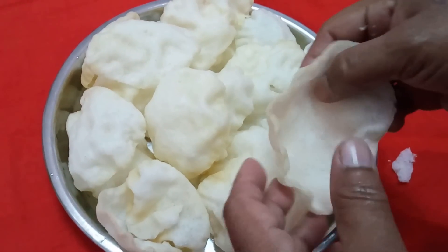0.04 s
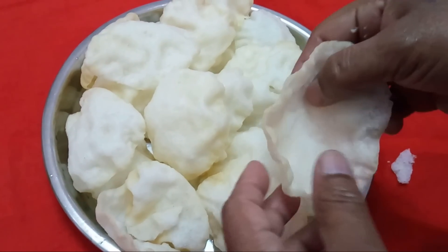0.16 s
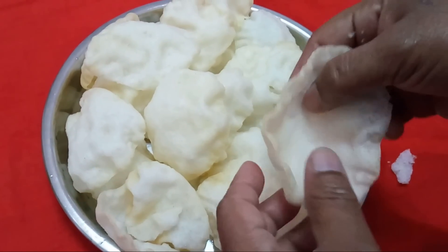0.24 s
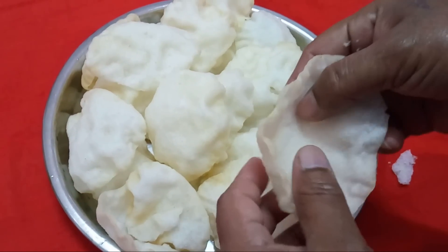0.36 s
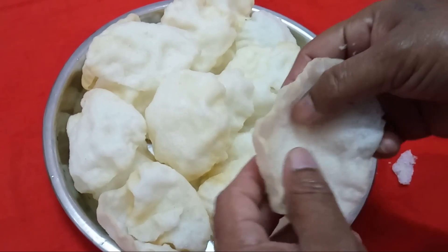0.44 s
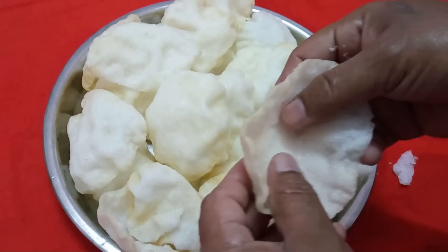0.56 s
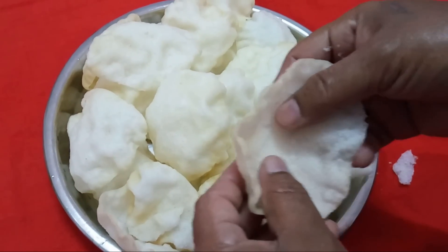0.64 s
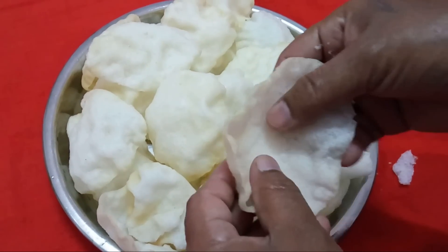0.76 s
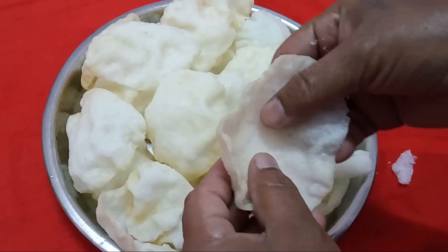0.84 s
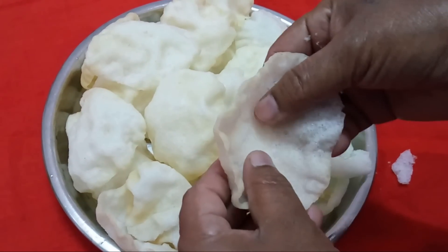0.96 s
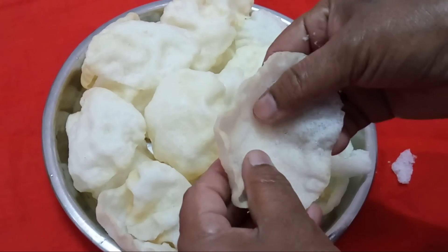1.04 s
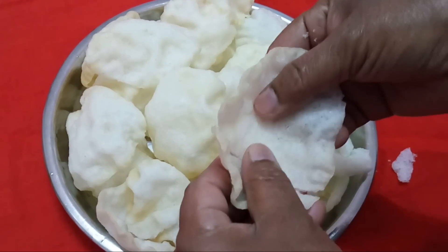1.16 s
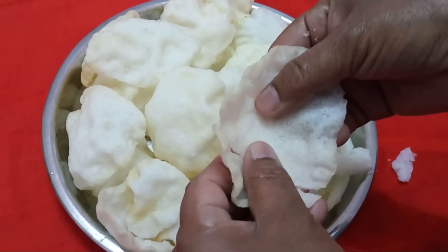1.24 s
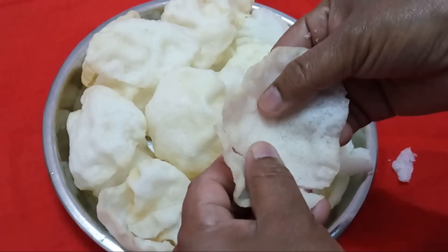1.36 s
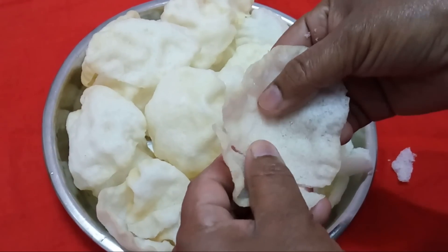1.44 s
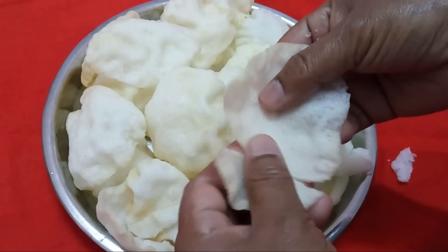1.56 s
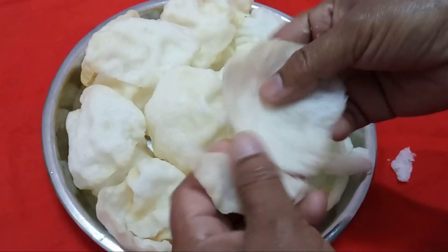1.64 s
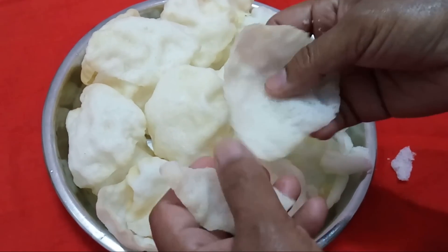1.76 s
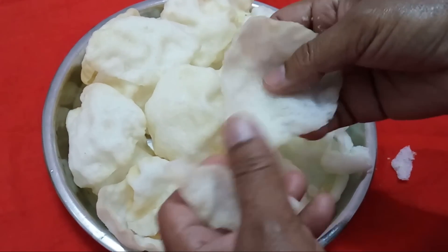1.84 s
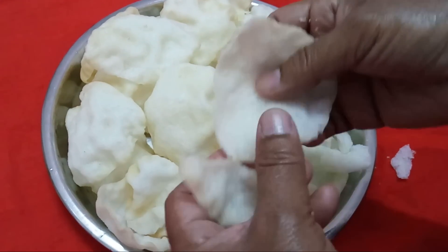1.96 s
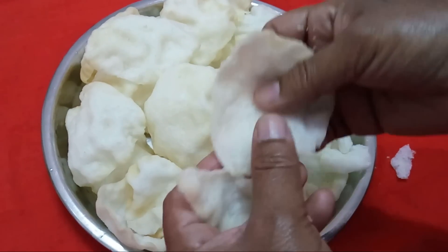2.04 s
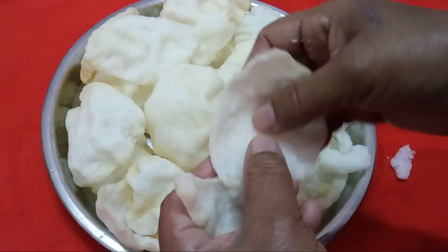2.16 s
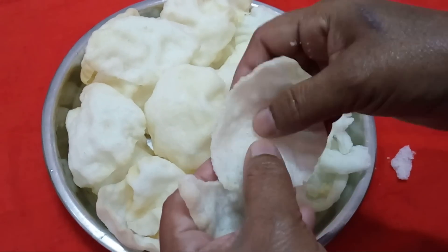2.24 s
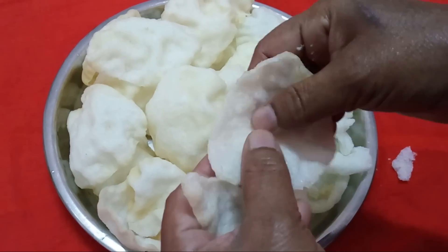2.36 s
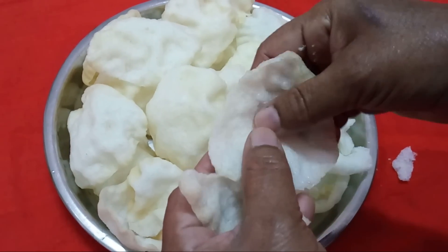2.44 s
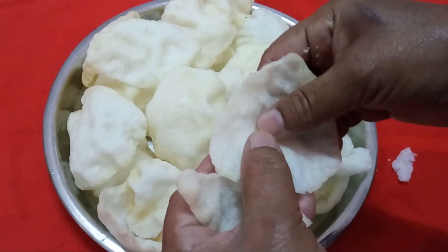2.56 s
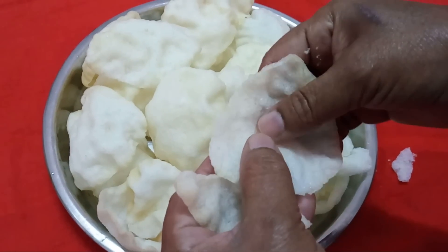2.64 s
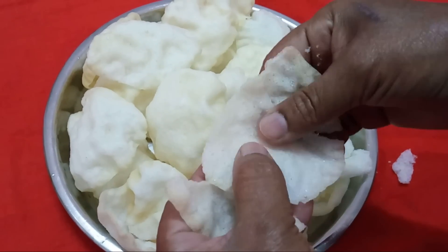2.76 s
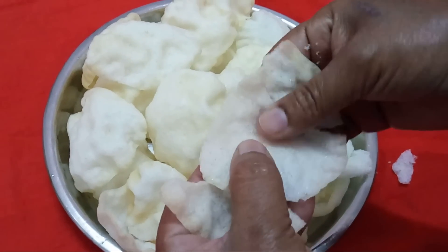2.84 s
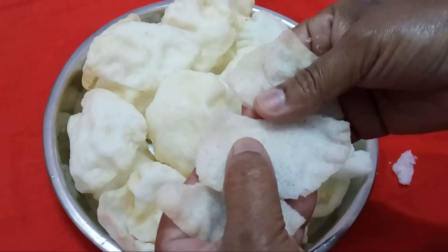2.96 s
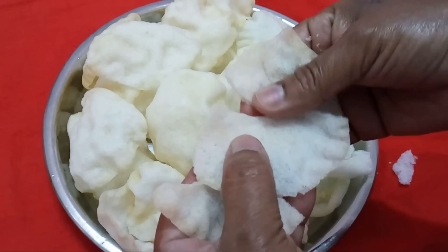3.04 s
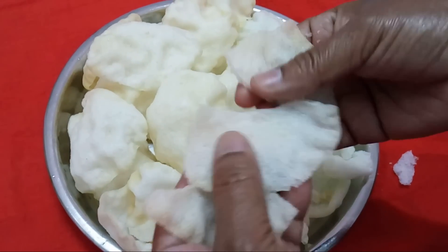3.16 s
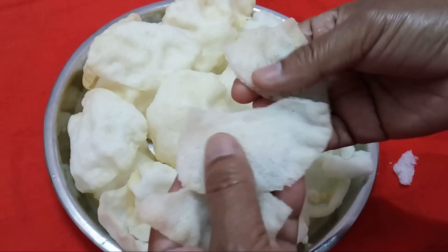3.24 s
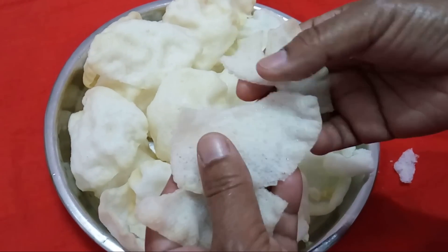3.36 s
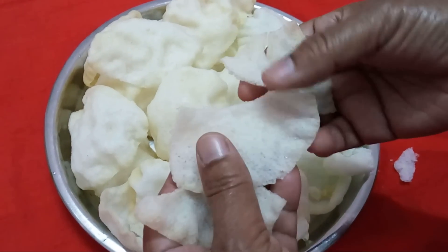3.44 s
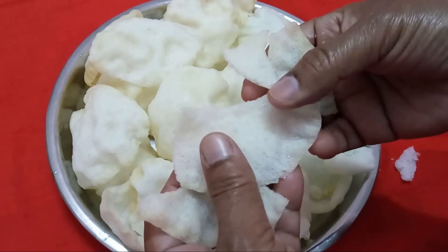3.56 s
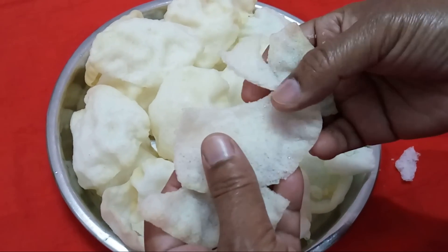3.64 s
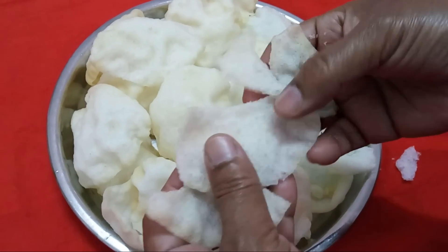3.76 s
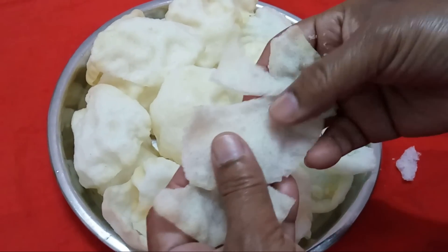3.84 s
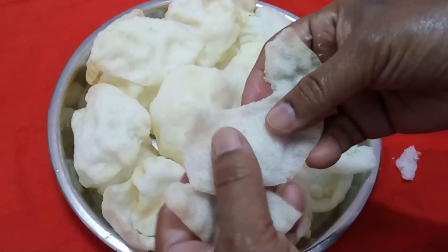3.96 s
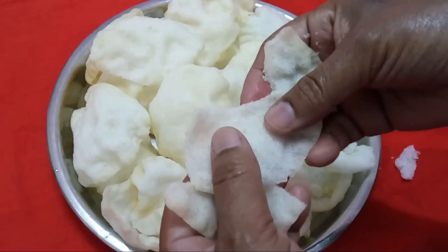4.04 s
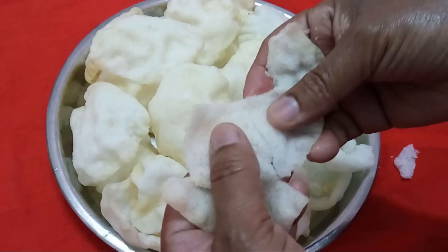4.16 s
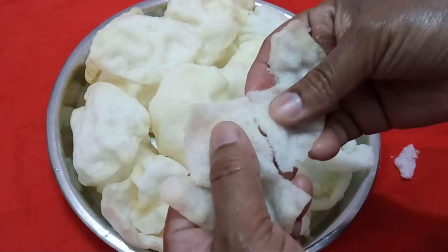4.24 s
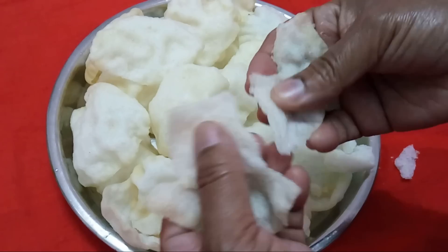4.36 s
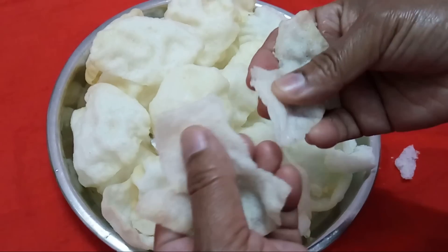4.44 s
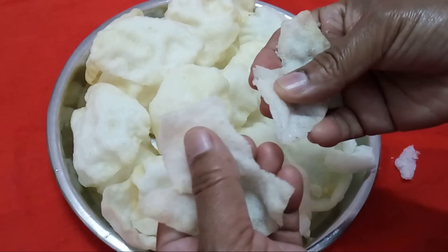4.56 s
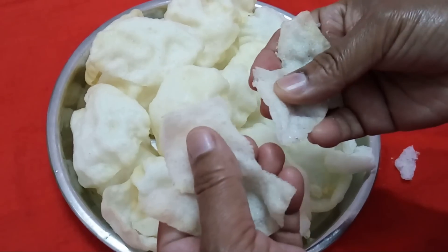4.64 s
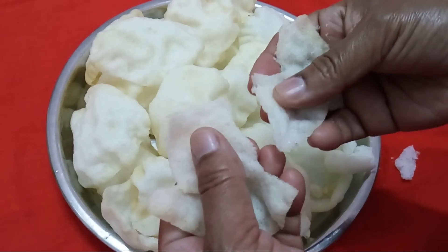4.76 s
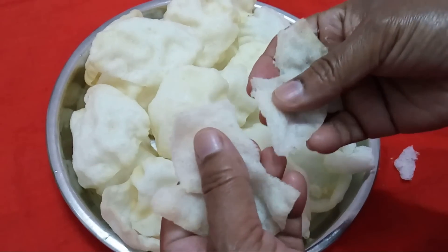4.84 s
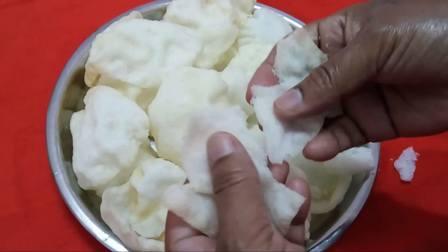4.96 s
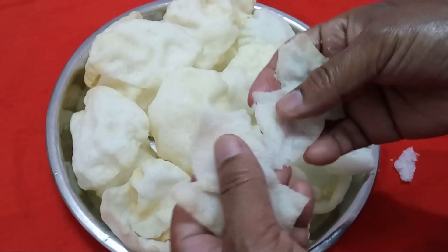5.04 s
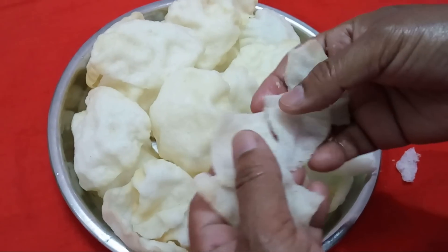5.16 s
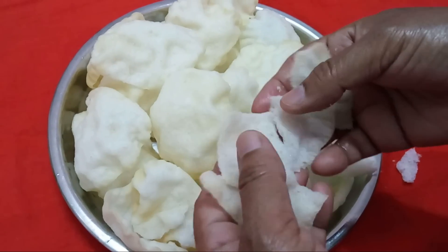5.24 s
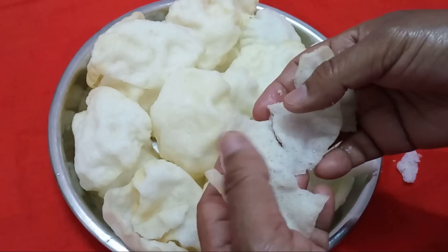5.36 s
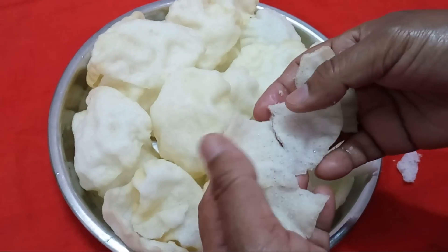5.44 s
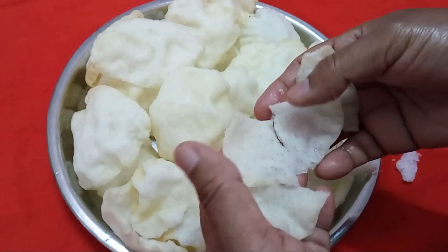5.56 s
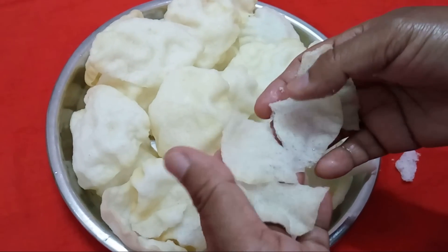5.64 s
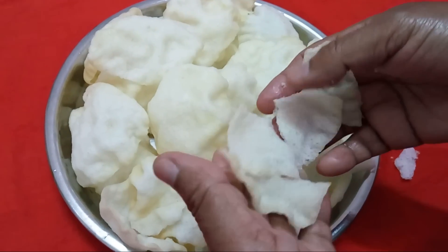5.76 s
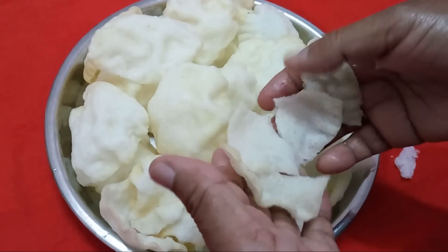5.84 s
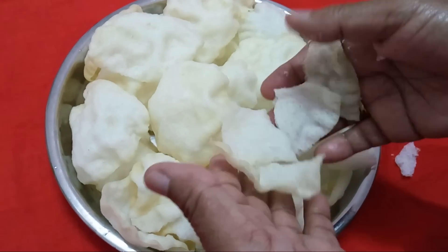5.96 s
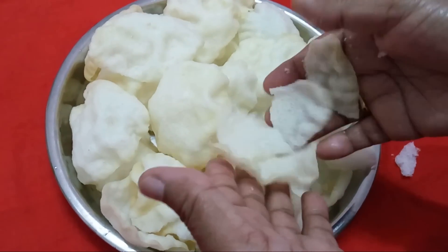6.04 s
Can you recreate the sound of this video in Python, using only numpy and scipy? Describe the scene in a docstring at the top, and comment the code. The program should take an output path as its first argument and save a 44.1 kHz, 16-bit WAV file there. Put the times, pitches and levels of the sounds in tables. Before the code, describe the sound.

In a kitchen, close to a phone with two microphones, hands break a crisp fried wafer over a steel plate. A distant engine hums low throughout, unsteady and boomy, growing stronger between about 2 and 4.5 seconds, then easing. At first fingers rasp softly and jerkily on the blistered crust, with a few tiny ticks. At 1.25 s the wafer snaps loudly with a short thump; smaller cracks follow from 1.5 to 1.8 s. From 2.1 s crackling thickens, a thin high ring briefly joining the rasp, and strong breaks land at 2.8 s, with a deep thump, and 3.03 s. After a lull of rubbing, clustered crunches run from 3.6 to 4.45 s. At about 4.45 s a shard clinks on the plate and bounces with a short metallic ring. Sparse faint ticks and rustles remain until about 6 s. Cracks are bright, dry and mostly left.

```python
"""Close to a phone with two microphones, hands break a crisp fried wafer over a steel plate heaped with more.
From the start a distant engine booms in the low kitchen modes: wavering overtones over filtered noise.
Fingers and shards rasp on the blistered crust (jerky noise and pops); brittle cells crack in short bursts.
From 1.25 s pieces snap with damped swings; near 2 s a thin ring joins the rasp (noise in resonances);
past 4.4 s a shard hits and bounces on the plate, ringing its damped modes."""
import sys
import numpy as np
from scipy import signal
from scipy.fft import rfft, irfft
from scipy.io import wavfile
from scipy.ndimage import uniform_filter1d

SR = 44100
rng = np.random.default_rng(int(sys.argv[2]) if len(sys.argv) > 2 else 0)


def amplitude_ratio(level_db):
    """Convert a level in decibels to the matching linear amplitude (field) ratio."""
    exponent = np.asarray(level_db, float) / 20
    return 10 ** exponent


def generate_wav(sig):
    """Save sig (samples, or channels by samples) to the path in sys.argv[1] as 16-bit PCM at SR."""
    pcm = np.round(np.clip(np.atleast_2d(sig).T, -1, 1) * 32767).astype(np.int16)
    wavfile.write(sys.argv[1], SR, pcm)


N = 269186
TIME_S = np.arange(N) / SR

# distant engine: start_s, firing_hz, load_db
ENGINE = [(0, 23, -54), (.13, 22.7, -45.5), (.36, 21.7, -53), (.6, 20.5, -47.5), (1.1, 18.7, -49.5),
          (1.45, 18.1, -44), (1.7, 18.2, -47), (2.1, 18.9, -41), (2.42, 19, -45.5), (2.6, 19.3, -37),
          (2.75, 19.3, -44.5), (3.14, 19.4, -38.5), (3.25, 19.6, -44.5), (3.42, 19.3, -34.5),
          (3.7, 19.1, -41), (4.0, 18.8, -35.5), (4.2, 18.4, -41.5), (4.45, 18.3, -39.5),
          (5.03, 17.4, -41.5), (5.16, 17.3, -46.5), (5.75, 17.4, -52.5), (5.98, 17.6, -45.5),
          (6.1, 17.6, -50.5)]
# room modes that lift the booms: mode_hz, width_hz, level_db
KITCHEN_MODES = [(83.3, 2.6, 2.3), (85.6, 12.6, 12.25), (88.06, 9.9, 11.6), (117.53, 11.45, 16.93),
                 (140.1, 13.5, 4.6), (206, 17.3, 0.56), (303.1, 46.5, 4.37)]
# balance of higher booms against the lowest as the engine moves: start_s, tilt_db
UPPER_BOOMS = [(0, 0.5), (1.1, -2.5), (1.5, 1), (2.5, 4.5), (4.0, 2.5), (4.4, -2), (5, 0.5), (6.1, 2.5)]
# spectrum of the low rumble: freq_hz, level_db (per Hz)
RUMBLE_COLOUR = [(20, -26), (32, 11), (56, -19), (72, 6), (135, 11.5), (175, -6), (212, 4), (308, 0),
                 (400, 0.5), (460, -13), (1000, -22.5), (1600, -45.5)]
# spectrum of the hiss: freq_hz, level_db (per Hz)
HISS_COLOUR = [(290, -27), (500, -7), (980, -8), (1520, -12), (4050, -27.5), (15100, -81), (16500, -18)]
# brief drops of background and, in part, rasp round the loudest cracks: start_s, end_s, level_db
DIPS = [(1.184, 1.222, -13), (2.763, 2.805, -11.5), (2.837, 2.889, -18), (2.924, 3.078, -13),
        (4.228, 4.338, -12)]
# strokes of skin and shards along the crust: peak_s, relative_level_db, rise_s, fall_s
STROKES = [(0, -37.5, 0.035, 0.33), (0.149, -29.5, 0.034, 0.061), (0.323, -34, 0.026, 0.071),
           (.49, -31.5, 0.058, 0.062), (.645, -33, 0.18, 0.06), (0.738, -32, 0.017, 0.022),
           (.93, -41.5, 0.32, 0.14), (1.17, -35.5, 0.3, 0.016), (1.327, -24.5, 0.092, 0.13),
           (1.61, -30.5, 0.048, 0.086), (1.681, -26.5, 0.046, 0.15), (1.78, -39, 0.21, 1),
           (2.088, -37, 0.046, 0.13), (2.23, -28.5, 0.11, 0.13), (2.47, -27.5, 0.098, 0.087),
           (2.82, -30, 0.063, 0.25), (3.05, -28, 0.33, 0.33), (3.291, -26.5, 0.078, 0.038),
           (3.62, -39, 0.62, 0.38), (3.76, -38, 0.044, 0.21), (3.88, -38.5, 0.08, 0.36),
           (3.98, -31.5, 0.039, 0.06), (4.14, -32.5, 0.17, 0.069), (4.36, -29, 0.26, 0.12),
           (4.471, -36, 0.43, 0.14), (5.198, -40, 0.0089, 0.025), (5.259, -38.5, 0.064, 0.22),
           (5.47, -41.5, 0.042, 0.012), (5.7, -34, 0.013, 0.026), (5.8, -47, 0.11, 0.1),
           (6.001, -42, 0.069, 0.8)]
# stirring by fingers at rest on the crust: start_s, relative_level_db
GRIP = [(0, -41.5), (4.5, -77), (4.65, -56.5), (6.1, -58.5)]
# tone of the piece in hand: start_s, treble_share_db, lean (from the lower to the upper middle part)
PIECE = [(0, -4.5, -0.3), (1.2, -5, 0.22), (2.0, -3.5, -0.21), (2.3, -4, 0.089), (3.0, -3, 0.031),
         (3.9, -5.5, 0.71), (4.3, -3, 0.98), (4.5, -6.5, 0.4), (6.1, -0.5, -0.16)]
# rings of the whole wafer under the fingers: ring_hz, width_hz, relative_level_db
WHOLE_WAFER = [(1710, 300, -15), (3050, 450, -5), (5400, 500, -10)]
# crust as the microphones colour it: freq_hz, level_db (per Hz)
CRUST = [(290, -8), (500, -10.5), (1130, -10), (1610, -7.5), (2290, -6.5), (2650, 0), (3500, 7), (3930, 5),
         (6470, 7), (7710, 0.5), (10000, 11), (13200, -2), (15100, 4), (15800, -8), (16500, -40)]
# edges of the four parts of the crust spectrum: edge_hz
EDGES_HZ = [600, 2500, 4400, 8000, SR]
# cracks, each with its own low part and ring pitch: start_s, relative_level_db, low_part_db, ring_hz
CRACKS = [(0.018, -26.5, -27, 4800), (0.1404, -28, -5, 3200), (0.2235, -20.5, -3.5, 3950),
          (0.988, -29, -20.0, 2740), (1.0095, -19.5, -14, 2950), (1.181, -11, -16, 5200),
          (1.191, -13, -14.0, 5430), (1.2481, -14.5, 3.5, 4260), (1.2489, 1, -6, 3044),
          (1.25, -6.5, -8.5, 3530), (1.5312, -22.5, -10, 3360), (1.5776, -17, -14, 7300),
          (1.5835, -14, -32.0, 2930), (1.611, -11.5, -12, 2960), (1.64, -11, -25.0, 3700),
          (1.702, -19.5, -21.0, 3400.0), (1.7669, -12.5, -14, 3950), (2.087, -15, -31.0, 6100.0),
          (2.147, -12.5, -34, 6300), (2.161, -6.5, -29, 6400), (2.2253, -20, -20, 2780),
          (2.234, -13.5, -11, 4900), (2.3072, -17.5, -29.0, 6700.0), (2.325, -15, -29.0, 4080),
          (2.35, -11.5, -35, 6540), (2.383, -13, -21.0, 4120), (2.406, -15, -20, 6400.0),
          (2.4173, -19.0, -33.0, 6500.0), (2.4263, -15.5, -30, 6700.0), (2.456, -9, -35, 4100),
          (2.464, -16, -33, 4250), (2.479, -10.5, -44, 6460), (2.5012, -11, -32.0, 6160),
          (2.588, -23, -26, 6600.0), (2.683, -19, -19.0, 3760), (2.6947, -17, -9, 6400),
          (2.733, -19, -20, 4300), (2.745, -16, -30.0, 4400.0), (2.7693, -17, -22, 5100),
          (2.787, -19.5, -21, 3700.0), (2.7968, -12.5, -36.0, 3600.0), (2.8138, 0, -1.5, 4800.0),
          (2.818, -5, -10.0, 5600.0), (2.828, -10, -32.0, 4540), (2.8561, -11, -24, 4870),
          (2.938, -13, -28, 5070), (2.943, -7, -22, 4500), (2.999, -21, -14, 3380),
          (3.003, -16.5, -27.0, 3440), (3.0333, 0.5, -5, 3470), (3.0366, -20, -17, 4000.0),
          (3.366, -21.5, -30.0, 4740), (3.59, -23, -25, 2870), (3.5988, -19.0, -12, 6460),
          (3.63, -10.5, -14, 6200), (3.647, -12.5, -18, 2800.0), (3.652, -23, -15, 4600),
          (3.665, -19, -6, 4500), (3.685, -13, -12.5, 2820), (3.7493, -19, -5, 3180),
          (3.755, -20, -19, 3250), (3.7882, -20, -7.5, 3300.0), (3.852, -19, -22, 6140),
          (3.8686, -12.5, -27.0, 4640), (3.874, -14, -14, 3300), (3.8966, -12.5, -15, 6070),
          (4.0193, -17.5, -25, 4630), (4.1025, -19, -22, 4230), (4.131, -15, -32, 6240),
          (4.1439, -12.0, -11.5, 3200), (4.1623, -24, 8.5, 4500.0), (4.1771, -16.5, -8.0, 3660),
          (4.1812, -11.5, -5, 3030), (4.215, -23, -5, 4740), (4.2306, -19, -23, 5600.0),
          (4.2401, -10, -11, 4600), (4.295, -11, -16, 5500.0), (4.2966, -8.5, -2.5, 5740),
          (4.381, -15, -32.0, 6400), (4.41, -17, -28.0, 5000.0), (4.4425, -18, -2, 4200),
          (4.4777, -16, -28.0, 4040), (5.005, -22.5, -11, 6140), (5.1933, -23.5, -21.0, 6100),
          (5.2478, -20, -13.5, 6240), (5.3563, -22.5, -26, 3200.0), (5.693, -25.5, -40, 6750),
          (5.711, -24.5, -30, 6000)]
# pieces giving way and pushing air: start_s, peak_db, swing_hz, t60_s
THUMPS = [(1.2493, -18, 105, .065), (2.8135, -8, 96, .075), (2.158, -36, 1700, .04),
          (3.0345, -18, 230, .018), (4.1615, -32, 800, .03), (4.178, -25, 1560, .03),
          (4.298, -21, 170, .025), (4.453, -33, 800, .03)]
# thin ring under the rasp: ring_hz, width_hz, relative_level_db
SINGING = [(2715, 30, 5), (3065, 50, 2)]
# level of the thin ring: start_s, level_db
SINGING_LEVEL = [(1.97, -57), (2.04, -38), (2.063, -40.5), (2.1, -34.5), (2.17, -44.5), (2.26, -33.5),
                 (2.3, -36.5), (2.43, -48), (2.6, -45), (2.7, -59)]
# modes of the steel plate: mode_hz, relative_level_db, t60_s
PLATE = [(1513, -17, .12), (1949, -21, .3), (2143, -8, .2), (2358, -18, .25), (2955, -6, .08),
         (3252, -14, .33), (3634, -8, .28), (3962, -1, .28), (4226, -2, .24), (4320, 4, .05),
         (4393, -3, .09), (4678, -13, .28), (4888, -8, .17), (5087, -9, .1), (5486, -15, .22),
         (5895, -8, .2), (5975, -12, .15), (6331, -16, .25)]
# blows on the plate: start_s, relative_level_db, brightness_db_per_octave
PLATE_HITS = [(4.443, -23, -2), (4.478, -34.5, 1), (4.542, -36.5, -8.5)]


def curve(table):
    """Interpolates the value columns of a (s, value, ..) table at every sample."""
    s, *columns = np.transpose(table)
    return [np.interp(TIME_S, s, c) for c in columns]


def colour(x, points, lo_hz=1., hi_hz=1e6, size=1024):
    """Minimum-phase filter with the given spectrum between soft edges; white noise keeps its power."""
    hz = np.maximum(np.fft.rfftfreq(size, 1 / SR), 1)
    point_hz, point_db = np.transpose(points)
    gain = amplitude_ratio(np.interp(np.log(hz), np.log(point_hz), point_db))
    gain = gain / np.sqrt((1 + (lo_hz / hz) ** 6) * (1 + (hz / hi_hz) ** 8)) + 1e-6
    # folding the cepstrum makes the response causal
    cepstrum = irfft(np.log(gain))
    cepstrum = np.r_[cepstrum[0], 2 * cepstrum[1:size // 2], np.zeros(size // 2)]
    response = irfft(np.exp(rfft(cepstrum)))
    response = response / np.sqrt(np.sum(response ** 2))
    response = np.reshape(response, (1,) * (np.ndim(x) - 1) + (-1,))
    return signal.oaconvolve(x, response, axes=-1)[..., :N]


def band(x, hz, width_hz):
    """Steep resonance; white noise keeps its power."""
    edges_hz = hz * (1 + width_hz / hz / 2) ** np.array([-1, 1])
    sos = signal.butter(2, edges_hz, "bandpass", fs=SR, output="sos")
    return np.sqrt(SR / 2 / width_hz) * signal.sosfilt(sos, x)


def walk(rate_hz):
    """Random levels held 1 / rate_hz and slewed twice; spread near 1."""
    hold = int(SR / rate_hz)
    steps = np.repeat(rng.standard_normal(N // hold + 1), hold)
    return 1.3 * uniform_filter1d(uniform_filter1d(steps, hold), hold)[:N]


def ring(x, hz, t60_s):
    """One damped mode as a complex one-pole resonator."""
    pole = np.exp(2j * np.pi * hz / SR - np.log(1000) / (t60_s * SR))
    return signal.lfilter([1], [1, -pole], x).imag


def ports(noise, alike):
    """Two microphones from three noises: a shared part that reaches the left first, and parts of their own."""
    lag_samples = 8
    shared = np.array([noise[0], np.roll(noise[0], lag_samples)])
    return np.sqrt(alike) * shared + np.sqrt(1 - alike) * noise[1:]


def shares(low_db, treble_db, lean):
    """Gains of four spectrum parts; the two middle ones split the power that the treble leaves."""
    treble = np.clip(amplitude_ratio(treble_db), 0, .97)
    middle = np.sqrt(1 - treble ** 2)
    angle_rad = np.pi / 4 * (1 + np.tanh(lean))
    return np.array([amplitude_ratio(low_db), middle * np.cos(angle_rad), middle * np.sin(angle_rad), treble])


def crust(parts):
    """The crust colours each part of its excitation within that part's band."""
    return sum(colour(x, CRUST, lo, hi) for x, lo, hi in zip(parts, EDGES_HZ, EDGES_HZ[1:]))


def dips():
    """Brief drops in level, in dB: 4 ms down, 34 ms back."""
    return sum(db * np.interp(TIME_S, [start - .004, start, end, end + .034], [0, 1, 1, 0])
               for start, end, db in DIPS)


def boom(hz, db):
    """One engine overtone, lifted near room modes: nearly a tone, wavering in size and phase."""
    between_modes_db, upper_from_hz, waver_db = -7, 100.4, 2.8
    blur_rad_per_100_hz = 0.69  # uneven firing smears the higher overtones more
    lift = amplitude_ratio(between_modes_db) ** 2
    for mode_hz, width_hz, top_db in KITCHEN_MODES:
        lift = lift + amplitude_ratio(top_db) ** 2 / (1 + (2 * (hz - mode_hz) / width_hz) ** 2) ** 2
    tilt_db = curve(UPPER_BOOMS)[0] * np.clip((hz - upper_from_hz) / 5, -1, 1)
    size = amplitude_ratio(db + waver_db * walk(12) + tilt_db)
    blur_rad = blur_rad_per_100_hz * hz / 100 * walk(10)
    turns = np.cumsum(hz) / SR + rng.random()
    return np.sqrt(2 * lift) * size * np.sin(2 * np.pi * turns + blur_rad)


def kitchen():
    """Engine booms and rumble, nearly alike at both microphones, over faint independent hiss."""
    overtones, overtone_db_per_octave = range(4, 18), -7
    rumble_over_load_db, rumble_waver_db, rumble_slew_s = 2.5, 2.8, 0.33
    left_over_right_db, side_db, hiss_db = 1.1, -6.5, -57
    firing_hz, load_db = curve(ENGINE)
    rumble_db = uniform_filter1d(load_db, int(rumble_slew_s * SR)) + rumble_over_load_db
    rumble = colour(rng.standard_normal((2, N)), RUMBLE_COLOUR, size=8192)
    mid, side = rumble * amplitude_ratio(rumble_db + rumble_waver_db * walk(25))
    booms = sum(boom(k * firing_hz, load_db + overtone_db_per_octave * np.log2(k / overtones[0]))
                for k in overtones)
    balance = amplitude_ratio(np.array([[left_over_right_db], [-left_over_right_db]]) / 2)
    low = balance * (mid + booms) + amplitude_ratio(side_db) * np.array([side, -side])
    hiss = amplitude_ratio(hiss_db) * colour(rng.standard_normal((2, N)), HISS_COLOUR)
    return (low + hiss) * amplitude_ratio(dips())


def strokes():
    """Level, treble share and lean of the rasp: strokes swell and fade over the resting grip."""
    edge_db = -15  # one rise before and one fall after the peak
    brighter_per_db, middling_db = -0.04, -41.5
    power = amplitude_ratio(curve(GRIP)[0]) ** 2
    for s, peak_db, rise_s, fall_s in STROKES:
        before = (s - TIME_S) / max(rise_s, .005)
        after = (TIME_S - s) / max(fall_s, .005)
        away = np.where(TIME_S < s, before, after)
        power = power + amplitude_ratio(peak_db + edge_db * away) ** 2
    db = 10 * np.log10(power)
    treble_db, lean = curve(PIECE)
    return db, treble_db + brighter_per_db * (db - middling_db), lean


def pop_grains():
    """Small cells pop at random; each pop favours its own part of the spectrum."""
    pops_per_s, pop_db, scatter_db, top_db, decay_ms, part_db = 190, -1, 4.5, 10, .6, 5
    extra_db = np.minimum(scatter_db * rng.exponential(size=N), top_db)
    pops = (rng.random(N) < pops_per_s / SR) * amplitude_ratio(pop_db + extra_db)
    pops = pops * amplitude_ratio(part_db * rng.uniform(-3.23, 1, (5, N)))
    shape = np.exp(-np.abs(np.arange(-128, 129)) * 1000 / (decay_ms * SR))
    return signal.oaconvolve(pops, shape[None], "same", axes=-1)


def rasp():
    """Skin slides on the crust in uneven jerks; the wafer rings under the fingers until it breaks."""
    patchy_db, left_over_right_db, low_db, trim_db = 3.0, 4.5, -18, -7.0
    dip_share, first_break_s = 0.22, 1.25
    db, treble_db, lean = strokes()
    level = amplitude_ratio(db + trim_db + dip_share * dips())
    drive = level * (amplitude_ratio(patchy_db * walk(60)) + pop_grains())
    sides = amplitude_ratio(np.array([[left_over_right_db], [-left_over_right_db]]) / 2)
    # a duller rasp reaches further down
    gains = shares(low_db - 2.47 * treble_db, treble_db, 0.041 * walk(23) + lean)
    # each part flickers a little on its own
    gains = gains * amplitude_ratio([2.67 * walk(40) for _ in range(4)])
    whole = TIME_S < first_break_s
    rubbed = sides * ports(rng.standard_normal((3, N)) * drive[4] * whole, 0.1)
    wafer = sum(amplitude_ratio(top_db + 4.2 * walk(6.93)) * band(rubbed, hz, width_hz)
                for hz, width_hz, top_db in WHOLE_WAFER)
    parts = [sides * ports(rng.standard_normal((3, N)) * d * gain, 0.037)
             for d, gain in zip(drive, gains)]
    return wafer + crust(parts)


def cracks():
    """Brittle cells burst for about a millisecond, ring the crust they split and tail off in the heap."""
    burst_ms, rise_ms, length_scatter = 1.9, 1.1, 0.26
    tail_db, tail_ms = -22, 6.7
    trim_db, left_over_right_db, side_scatter_db = 6.5, 9.0, 5.5  # hands nearer the left microphone
    treble_base_db, treble_scatter_db = -1, 1
    ring_db, ring_q, broad_db = -7.5, 6, -1.5
    size = 1024
    t_ms = np.arange(size) / SR * 1000
    parts = np.zeros((5, 2, N + size))  # four crust parts, then the ring
    noise = rng.standard_normal((len(CRACKS), 5, 3, size))
    chance = rng.standard_normal((len(CRACKS), 3))
    for (s, db, low_db, hz), burst, (place, bright, long) in zip(CRACKS, noise, chance):
        stretch = np.exp(length_scatter * long)  # a longer crack spreads the same energy
        body = np.exp(-(t_ms / burst_ms / stretch) ** 2) / np.sqrt(stretch)
        tail = amplitude_ratio(tail_db) * np.exp(-t_ms / tail_ms)
        shape = (1 - np.exp(-(t_ms / rise_ms) ** 2)) * (body + tail)
        right_drop_db = left_over_right_db + side_scatter_db * place
        sides = amplitude_ratio(db + trim_db - np.array([[0], [right_drop_db]]))
        treble_db = treble_base_db + treble_scatter_db * bright
        gains = shares(low_db, treble_db, 0.39 * np.log2(hz / EDGES_HZ[2]))
        gains = np.r_[gains * amplitude_ratio([0, broad_db, broad_db, 0]), amplitude_ratio(ring_db)]
        # tanh: no single cell stands far out of the burst
        cells = [gain * sides * ports(np.tanh(c) * shape, 0.44) for gain, c in zip(gains, burst)]
        i = int(s * SR)
        parts[:4, :, i:i + size] += cells[:4]
        parts[4, :, i:i + size] += band(cells[4], hz, hz / ring_q)
    return crust(parts[:4, :, :N]) + parts[4, :, :N]


def thumps():
    """A snapping piece pushes air in a damped swing whose first cycle is quicker."""
    out, settle_turns = np.zeros(N), .5
    for s, peak_db, hz, t60_s in THUMPS:
        since_s = np.maximum(TIME_S - s, 0)
        turns = hz * since_s
        early_turns = settle_turns * (1 - np.exp(-turns / settle_turns))
        out += amplitude_ratio(peak_db - 60 * since_s / t60_s) * np.sin(2 * np.pi * (turns + early_turns))
    return out


def singing():
    """Narrow resonances kept alive, off and on, by rubbing noise."""
    broken_db = 2.5
    noise = rng.standard_normal((2, N))
    lines = np.zeros((2, N))
    for hz, width_hz, db in SINGING:
        line = np.sqrt(width_hz) * ring(noise, hz, np.log(1000) / (np.pi * width_hz))
        lines += amplitude_ratio(db + broken_db * walk(24.47)) * line
    heard = (TIME_S > SINGING_LEVEL[0][0]) & (TIME_S < SINGING_LEVEL[-1][0])
    return heard * amplitude_ratio(curve(SINGING_LEVEL)[0]) * lines / lines.std()


def plate():
    """A shard hits the steel and bounces; each microphone hears the damped modes in another phase."""
    chatter_db = 2.0  # loose wafers make the ring flutter
    out = np.zeros((2, N))
    for hz, db, t60_s in PLATE:
        blows = np.zeros(N)
        for s, hit_db, tilt_db in PLATE_HITS:
            blows[int(s * SR)] = amplitude_ratio(hit_db + tilt_db * np.log2(hz / 3000))
        mode = amplitude_ratio(db + chatter_db * walk(45)) * ring(blows, hz, t60_s)
        out += [1.5 * mode, .6 * np.roll(mode, rng.integers(24))]
    return out


def scene():
    """Everything as it reaches the two microphones."""
    return kitchen() + rasp() + cracks() + thumps() + singing() + plate()


def band_limit(x):
    """A steep low-pass at the top of the band."""
    return signal.sosfilt(signal.butter(12, 16800, fs=SR, output="sos"), x)


def record(dry):
    """The phone rounds the peaks and cuts the top."""
    rounded = .55 * np.tanh(dry / .55)
    top_cut = signal.ellip(8, .2, 60, 15900, fs=SR, output="sos")
    mix = signal.sosfilt(top_cut, rounded)
    return band_limit(mix)


dry = scene()
out = record(dry)
generate_wav(out)
```